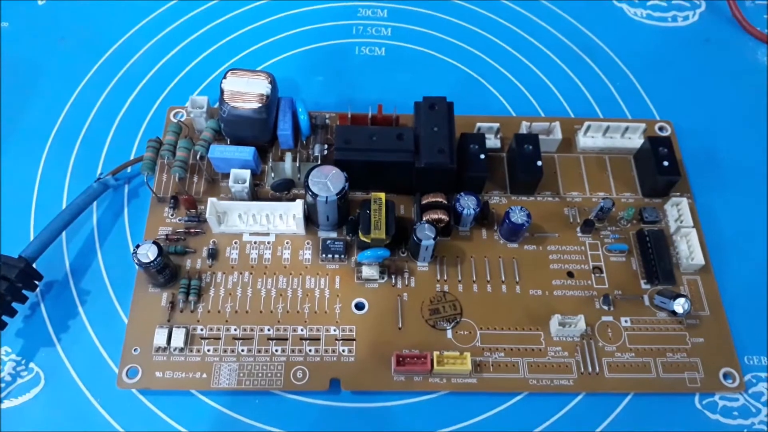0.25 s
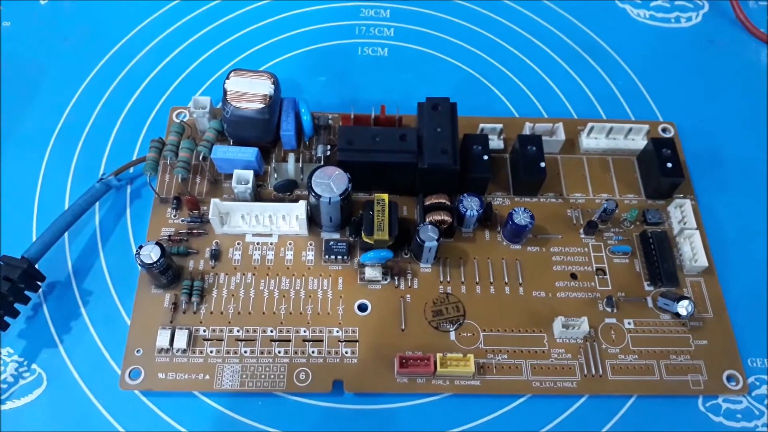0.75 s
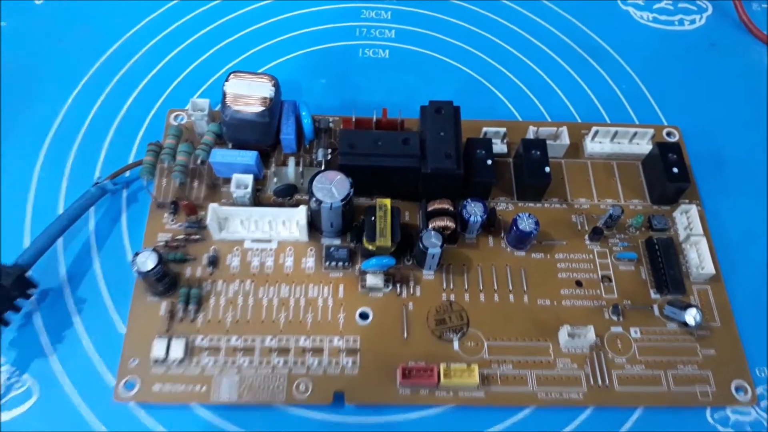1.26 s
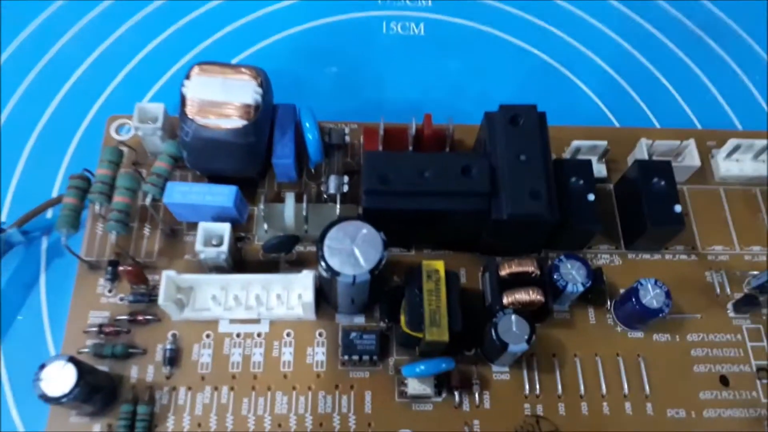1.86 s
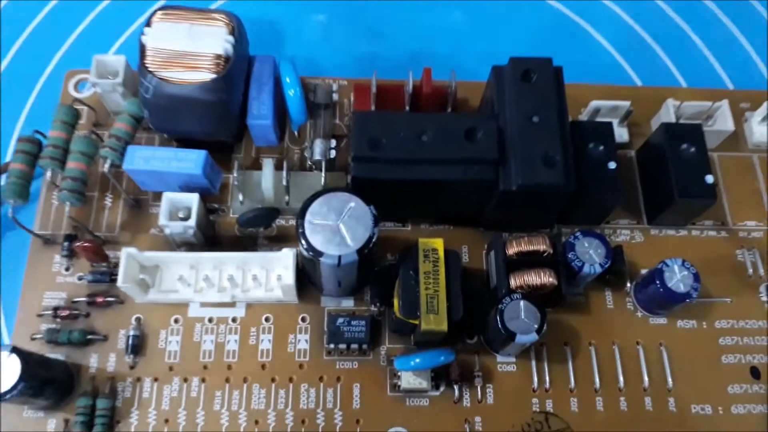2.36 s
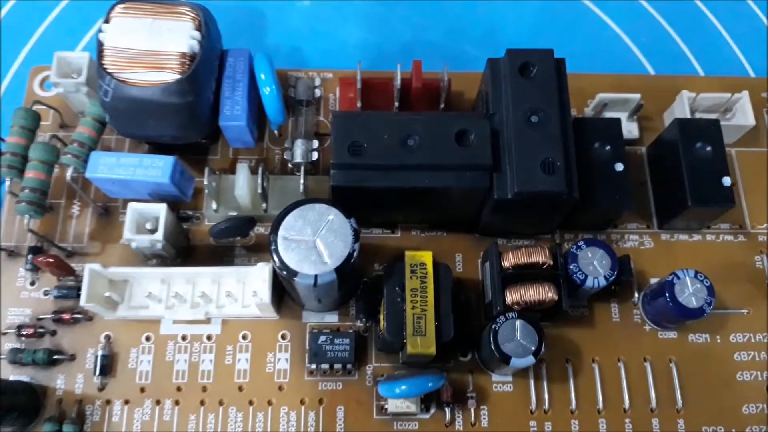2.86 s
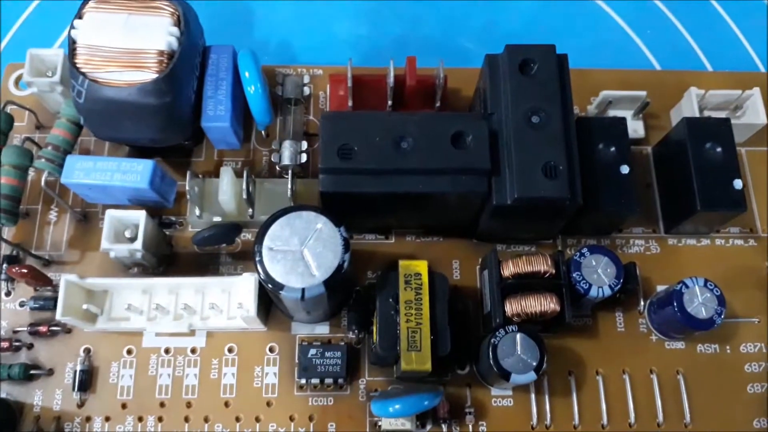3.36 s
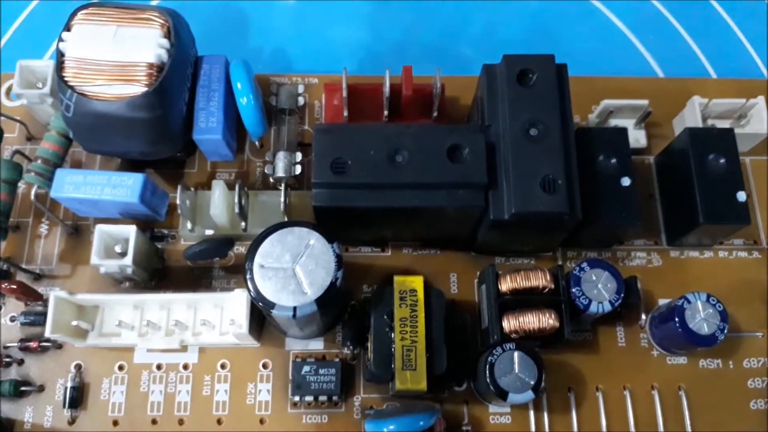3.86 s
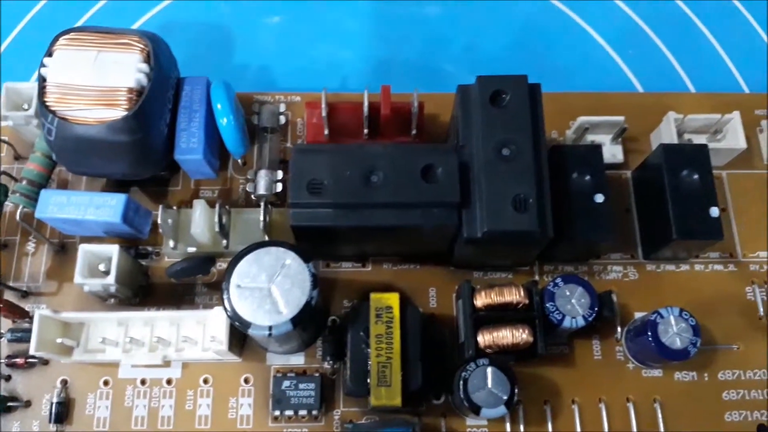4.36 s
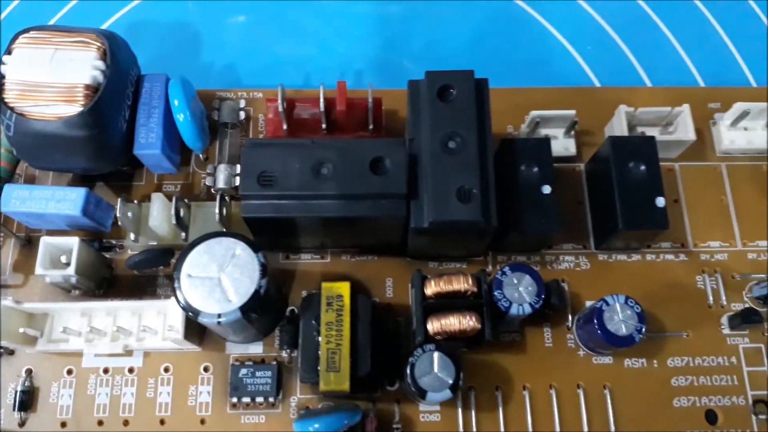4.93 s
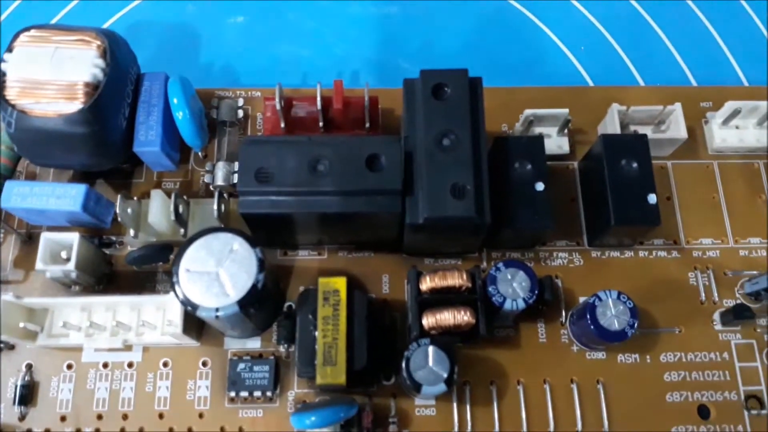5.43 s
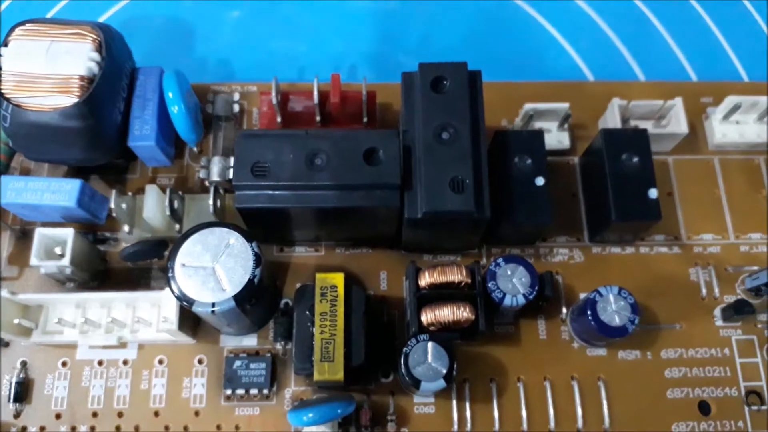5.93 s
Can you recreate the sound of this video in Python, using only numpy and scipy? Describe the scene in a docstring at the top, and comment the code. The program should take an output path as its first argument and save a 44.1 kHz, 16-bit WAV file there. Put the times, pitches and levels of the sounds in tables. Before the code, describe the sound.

Relays on a circuit board switch on a workbench in a small, quiet room. Three light metallic clacks come a little under a second apart, then three much louder, sharp double clicks keep the same pace. One faint clack and a last loud double click follow. Each has a brief ring and a short echo. The close hand-held phone picks up slight handling creaks and low room noise.

```python
"""On a workbench in a small room, relays on a circuit board switch every 0.83 s under a hand-held phone.
A faint tick usually leads a light clack or a heavy double click: the contacts touch, then the
armature, the iron flap pulled by the relay's magnet, slams home. The board rings and the walls answer.
Beneath lie a little handling noise, mains hum, a thin power-supply whine and steady room noise."""
import sys
import numpy as np
from scipy import signal
from scipy.fft import rfft, irfft, next_fast_len
from scipy.io import wavfile
from scipy.ndimage import uniform_filter1d

SR = 44100
rng = np.random.default_rng(int(sys.argv[2]) if len(sys.argv) > 2 else 0)


def transcribe(u):
    """Save the signal u as a 16-bit wav file named by the first command-line argument.

    u: samples, shape (n,) or (channels, n), limited to [-1, 1]; the rate is SR.
    q: integer samples, one column per channel.
    """
    v = np.clip(np.atleast_2d(u).T, -1, 1)
    q = np.round(v * 32767).astype(np.int16)
    wavfile.write(sys.argv[1], SR, q)


N = 272979

# each double click: start_s, travel_s (touch to slam), level_db, tilt_db_per_octave, slam_chatter_s
DOUBLE_CLICKS = [(2.537, .0167, -18.5, 1, 0.0027), (3.377, .0113, -19.5, 0, 0.0034),
                 (4.2122, .0114, -20, -0.4, 0.0033), (5.88, .0179, -19.5, -0.1, .0027)]
# the notes the metal rings with: pitch_hz, level_db, fade_s
TOUCH_NOTES = [(1894, -19.5, .05), (3616, -19, 0.044), (4384, -5, .035), (4880, -14, 0.04),
               (8820, -10.5, 0.008), (10730, -15.5, 0.024)]
SLAM_NOTES = [(588, -35.5, 0.36), (1478, -21, 0.028), (1846, -13, 0.041), (2333, -21.5, 0.068),
              (2532, -22, 0.17), (2546, -23, 0.12), (3130, -11, 0.02), (3660, -12, 0.018),
              (4338, -13, 0.0284), (4740, -16, 0.03), (6000, -18, 0.0306), (7540, -20.5, 0.017),
              (8450, -27.5, 0.027), (8715, -14, 0.05), (10170, -9, 0.023), (11400, -10.5, 0.025),
              (14210, -17, 0.03)]
# the tone of the rattling plastic case and board: pitch_hz, level_db
TOUCH_RATTLE = [(300, -16.5), (1150, -18.5), (1500, -4), (2500, 0.5), (4500, -0.5), (7000, 0.5),
                (8800, 3.5), (11400, 8), (13000, 1), (16000, -3.5)]
SLAM_RATTLE = [(150, -19.5), (350, -15), (1150, -18), (1400, -7.5), (2000, 8.5), (2800, -4), (3400, 9),
               (5000, 0.5), (7100, -1.5), (8800, 9.5), (11400, -3.5), (12500, -2.5), (14400, 9.5),
               (16000, 3)]
def double_clicks():
    """The power relay closes: its contacts touch softly, then the armature slams home."""
    out = np.zeros(N)
    for start_s, travel_s, level_db, tilt_db, chatter_s in DOUBLE_CLICKS:
        touch = strike(TOUCH_NOTES, TOUCH_RATTLE, tilt_db, chatter_s=0.002,
                       case_db=-3.5, case_fade_s=0.037, first_force=0.34)
        add(out, start_s, gain(level_db - 7.5) * touch)
        slam = strike(SLAM_NOTES, SLAM_RATTLE, tilt_db, chatter_s,
                      case_db=-2.5, case_fade_s=0.032, first_force=0.44)
        board = board_ring(level_db=-17, fade_s=0.16, build_s=0.0043)
        add(out, start_s + travel_s, gain(level_db) * (slam + board))
    return out


# each clack: start_s, level_db, tilt_db_per_octave, chatter_s
LIGHT_CLACKS = [(0.0399, -35, 0.5, 0.0049), (0.8764, -35.5, 2.5, 0.0033), (1.712, -32.5, 3, 0.0023),
                (5.056, -42.5, 0.5, 0.004)]
# the notes the metal rings with: pitch_hz, level_db, fade_s
CLACK_NOTES = [(1587, -21, 0.061), (1727, -12, 0.051), (2310, -20, 0.12), (2564, -18, 0.092),
               (2850, -24, 0.057), (3406, -14, 0.038), (3710, -14, 0.026), (4940, -20, 0.055),
               (5950, -19.5, 0.019), (8550, -9, 0.028), (8760, -11, 0.054), (9140, -14.5, 0.049),
               (10700, -33, .035)]
# the tone of the rattling case and board: pitch_hz, level_db
CLACK_RATTLE = [(300, -3), (1200, -17), (1700, 4.5), (3400, 8.5), (4400, -3), (7600, -1), (8800, -4),
                (11200, 5), (12600, -13), (14400, 2), (16000, -34)]
def clacks():
    """A relay switches with one light blow that shakes the board."""
    out = np.zeros(N)
    for start_s, level_db, tilt_db, chatter_s in LIGHT_CLACKS:
        clack = strike(CLACK_NOTES, CLACK_RATTLE, tilt_db, chatter_s,
                       case_db=-4.5, case_fade_s=0.037, first_force=0.69)
        board = board_ring(level_db=-11.5, fade_s=0.13, build_s=0.0032)
        add(out, start_s, gain(level_db) * (clack + board))
    return out


# each tick: start_s, level_db, tilt_db_per_octave
FAINT_TICKS = [(0.0, -59.5, -7.5), (.831, -50, 1.5), (1.666, -51, 1.5), (2.503, -52.5, 0),
               (3.339, -51.5, 1), (4.176, -53.5, -3), (5.848, -58, -4)]
# the notes the metal rings with: pitch_hz, level_db, fade_s
TICK_NOTES = [(1764, -8.5, 0.088), (2990, -8, 0.089), (8960, -12.5, 0.042), (10800, -3.5, 0.015)]
# the tone of the rattling case and board: pitch_hz, level_db
TICK_RATTLE = [(800, -21), (1800, -11.5), (3500, -0.5), (5500, -8.5), (8000, -3), (11000, -7), (13000, -25),
               (16000, 1)]
def ticks():
    """The parts of a small relay meet with a faint tick."""
    out = np.zeros(N)
    for start_s, level_db, tilt_db in FAINT_TICKS:
        tick = strike(TICK_NOTES, TICK_RATTLE, tilt_db, chatter_s=0.0013,
                      case_db=0, case_fade_s=0.041, first_force=0.7)
        add(out, start_s, gain(level_db) * tick)
    return out


def strike(notes, rattle_tone, tilt_db, chatter_s, case_db, case_fade_s, first_force):
    """Metal parts bounce briefly: the case rattles at once while the notes build up and ring on."""
    t = np.arange(SR // 3) / SR
    progress = np.minimum(t / chatter_s, 1)
    impacts = rng.choice([-1, 1], len(t)) * gain(9 * rng.uniform(-1, 1, len(t)))
    rise = first_force + (1 - first_force) * np.minimum(2 * progress, 1)
    force = rise * fade(t - chatter_s, case_fade_s)
    rattle = unit(colour(impacts * force, rattle_tone, tilt_db))
    sound = gain(case_db) * rattle * rms(force)
    for pitch_hz, level_db, fade_s in notes:
        # low notes are pure; above 4 kHz each is a cluster of five close pitches
        spread = 0.027 * np.clip((pitch_hz - 4000) / 4000, 0, 1)
        detune, phase = rng.uniform(-1, 1, size=(2, 5, 1))
        cluster = np.sin(2 * np.pi * pitch_hz * (1 + spread * detune) * t + np.pi * phase).sum(axis=0)
        loudness = progress * fade(t - chatter_s, fade_s)
        note_db = level_db + tilt_db * np.log2(pitch_hz / 5000)
        sound += gain(note_db) * unit(cluster * loudness) * rms(loudness)
    return sound


# the tone of the whole board ringing: pitch_hz, level_db
BOARD_TONE = [(200, -14.5), (350, 2.5), (500, -14), (1150, -7.5), (1400, 0.5), (2300, -1.5), (3300, 3),
              (4500, -4), (7000, -7.5), (8800, -3.5), (11400, -2), (12800, -7.5), (14400, -4.5),
              (16000, 0.5)]
def board_ring(level_db, fade_s, build_s):
    """Countless weak vibrations of the board take up a blow and fade as a dry hiss."""
    t = np.arange(SR // 3) / SR
    loudness = (1 - np.exp(-t / build_s)) * fade(t, fade_s)
    return gain(level_db) * noise(BOARD_TONE, len(t)) * loudness


# the tone the walls give back: pitch_hz, level_db
WALL_TONE = [(300, -8), (1300, -1), (2400, 9.5), (4200, 0.5), (9000, 4), (15000, -7)]
def room_echo(sound, level_db, fade_s, gap_s, build_s):
    """Sound bounces off the bench and near walls, blurring into one short echo."""
    t = np.arange(SR // 2) / SR
    swell = 1 - np.exp(-np.maximum(t - gap_s, 0) / build_s)
    echo = colour(rng.standard_normal(len(t)) * swell * fade(t, fade_s), WALL_TONE)
    return gain(level_db) * signal.fftconvolve(sound, unit(echo) / np.sqrt(len(t)))[:N]


# each clear snap of the phone's case: start_s, level_db
CLEAR_SNAPS = [(0.328, -60.5), (1.336, -60), (1.369, -52), (1.377, -55), (1.506, -62.5), (1.659, -57),
               (2.117, -66.5), (2.7975, -64.5), (3.1814, -67)]
# the tone of its snaps and creaks: pitch_hz, level_db
SNAP_TONE = [(2000, -22.5), (4500, -14), (6500, -3), (8000, -3.5), (8700, 6.5), (10000, 0), (13000, -4),
             (16000, -5)]
def case_snaps(faint_per_s=2, faint_db=-75):
    """The phone's case snaps in the hand: a few clear snaps among faint random ones."""
    out, t = np.zeros(N), np.arange(SR // 100) / SR
    faint = [(i / SR, faint_db) for i in np.flatnonzero(rng.random(N) < faint_per_s / SR)]
    for start_s, level_db in CLEAR_SNAPS + faint:
        burst = rng.standard_normal(len(t)) * fade(t, 0.0019)
        add(out, start_s, gain(level_db) * unit(colour(burst, SNAP_TONE)))
    return out


# each rub of the hand on the phone: peak_s, level_db, swell_s
GRIP_RUBS = [(1.335, -58, 0.46), (1.653, -66, 0.13), (2.11, -80.5, 1)]
def grip_creak(slips_per_s=600):
    """The grip sticks and slips in tiny jerks; each rub swells, holds and dies away."""
    loudness, t = np.zeros(N), np.arange(N) / SR
    for peak_s, level_db, swell_s in GRIP_RUBS:
        hold_s, fade_s = 0.16 * swell_s, 0.75 * swell_s
        loudness += gain(level_db) * fade(peak_s - t, swell_s) * fade(t - peak_s - hold_s, fade_s)
    slips = (rng.random(N) < slips_per_s / SR) * rng.choice([-1, 1], N)
    strength = gain(4 * rng.standard_normal(N))
    hiss = 0.074 * rng.standard_normal(N)
    return loudness * unit(colour(slips * strength + hiss, SNAP_TONE))


# a fingertip's tap on the phone: start_s, level_db, pitch_hz, fade_s
FINGER_TAPS = [(2.416, -46, 1003, 0.021)]
def finger_tap(push_s=0.0016):
    """A fingertip's soft push makes the phone's body knock briefly."""
    out, t = np.zeros(N), np.arange(SR // 20) / SR
    for start_s, level_db, pitch_hz, fade_s in FINGER_TAPS:
        rise = np.sqrt(np.minimum(t / push_s, 1))
        knock = np.sin(2 * np.pi * pitch_hz * t) * rise * fade(t - push_s, fade_s)
        brush = unit(colour(rng.standard_normal(len(t)) * fade(t, 0.0039), BRUSH_TONE))
        add(out, start_s, gain(level_db) * (knock + gain(-26.5) * brush))
    return out


# the tone of a sleeve or fingertip brushing: pitch_hz, level_db
BRUSH_TONE = [(80, -12), (250, 2.5), (700, -2), (1300, -3.5), (2200, 4), (3200, -6), (4500, -25),
              (9000, -15), (16000, -24)]
def sleeve_rustle(level_db=-66, start_s=1.055, rise_s=0.3, hold_s=0.47, fall_s=0.3):
    """A sleeve rustles while the arm makes one move."""
    move = np.interp(np.arange(N) / SR, np.cumsum([start_s, rise_s, hold_s, fall_s]), [0, 1, 1, 0])
    return move * gain(level_db + drift(30.1)) * noise(BRUSH_TONE)


# the tones in the hum: pitch_hz, level_db
HUM_TONES = [(59.5, -84.5), (119, -78.5), (238.5, -74), (359, -80.5), (2044, -82)]
def mains_hum():
    """Mains power hums in a few tones, each wavering in level and pitch."""
    return sum(gain(level_db + 2.1 * drift(13)) * wavering_tone(pitch_hz, wander_hz=2.6)
               for pitch_hz, level_db in HUM_TONES)


# how loud the whine is over time: time_s, level_db
WHINE_LEVELS = [(0, -84), (1.15, -82), (1.9, -91), (2.7, -81), (3.7, -83), (5.1, -76), (6.19, -76.5)]
def supply_whine(pitch_hz=11783):
    """The switching power supply gives off one thin, high tone."""
    level_db = np.interp(np.arange(N) / SR, *np.transpose(WHINE_LEVELS))
    return gain(level_db + 0.6 * drift(16)) * wavering_tone(pitch_hz, wander_hz=4)


# the tone of the room noise, and of its left-right difference: pitch_hz, level_db
AIR_TONE = [(12, -51), (20, 5), (27, -12.5), (49, -7), (85, -10.5), (119, -4.5), (202, -10.5), (238, -3.5),
            (382, -10), (491, -11), (767, -13), (2090, -15.5), (9660, -33.5), (12100, -28), (15500, -26)]
SIDE_TONE = [(20, -19), (120, -5.5), (250, -5), (600, -5.5), (2000, -7), (5000, -17), (15000, -25.5)]
def room_noise(middle_db=-64, side_db=-77):
    """A low, steady rush fills the room, not quite the same left and right."""
    middle = gain(middle_db) * noise(AIR_TONE)
    side = gain(side_db) * noise(SIDE_TONE)
    return np.array([middle + side, middle - side])


def gain(db):
    """Turn decibels into a multiplier."""
    return 10 ** (np.asarray(db) / 20)


def rms(sound):
    """The average strength of a sound (root mean square)."""
    return np.sqrt(np.mean(sound ** 2) + 1e-24)


def unit(sound):
    """Scale to an average strength of 1."""
    return sound / rms(sound)


def fade(t, fade_s):
    """Stay at 1 until t = 0, then drop 60 dB every fade_s."""
    return np.exp(-np.log(1000) * np.maximum(t, 0) / fade_s)


def add(out, start_s, sound):
    """Mix a sound in at start_s."""
    i = max(int(start_s * SR), 0)
    out[i:i + len(sound)] += sound[:max(N - i, 0)]


def colour(sound, tone, tilt_db=0):
    """Filter by a tone table; tilt_db per octave, pivoting at 5 kHz, brightens or dulls it."""
    n = next_fast_len(len(sound) + 1024, real=True) // 2 * 2
    octaves = np.log2(np.maximum(np.arange(n // 2 + 1) * SR / n, 1) / 5000)
    pitch_hz, level_db = np.transpose(tone)
    gain_db = np.interp(octaves, np.log2(pitch_hz / 5000), level_db) + tilt_db * np.maximum(octaves, -2)
    # fold the filter forward in time, so nothing rings before it is struck
    cepstrum = irfft(np.log(gain(gain_db)))
    cepstrum[1:n // 2] *= 2
    cepstrum[n // 2 + 1:] = 0
    return irfft(rfft(sound, n) * np.exp(rfft(cepstrum)))[:len(sound)]


def noise(tone, samples=N):
    """Steady noise of strength 1, shaped by a tone table."""
    return unit(colour(rng.standard_normal(samples), tone))


def drift(steps_per_s):
    """A smooth random wobble of strength 1."""
    width = int(SR / steps_per_s)
    steps = np.repeat(rng.standard_normal(N // width + 1), width)[:N]
    return unit(uniform_filter1d(uniform_filter1d(steps, width), width))


def wavering_tone(pitch_hz, wander_hz):
    """A pure tone whose pitch wanders a little."""
    return np.sqrt(2) * np.sin(2 * np.pi * np.cumsum(pitch_hz + wander_hz * drift(25.1)) / SR)


def scene():
    """Everything sits in the middle; only the room noise has a little width."""
    relays = ticks() + clacks() + double_clicks()
    handling = grip_creak() + sleeve_rustle() + case_snaps() + finger_tap()
    near = relays + handling
    air = room_noise()
    echo = room_echo(near, level_db=-16.5, fade_s=0.16, gap_s=0.0022, build_s=0.0032)
    return near + echo + mains_hum() + supply_whine() + air


def record(dry):
    """The phone's microphone softens the highest treble, then the very top is cut off."""
    soften_hz, cut_hz = 14900, 15750
    soft = signal.sosfilt(signal.butter(6, soften_hz, fs=SR, output="sos"), dry)
    return signal.sosfilt(signal.ellip(10, 0.2, 70, cut_hz, fs=SR, output="sos"), soft)


dry = scene()
out = record(dry)
transcribe(out)
```